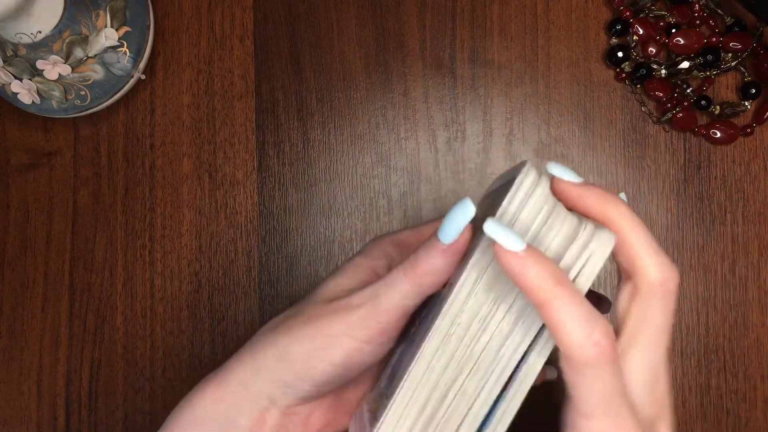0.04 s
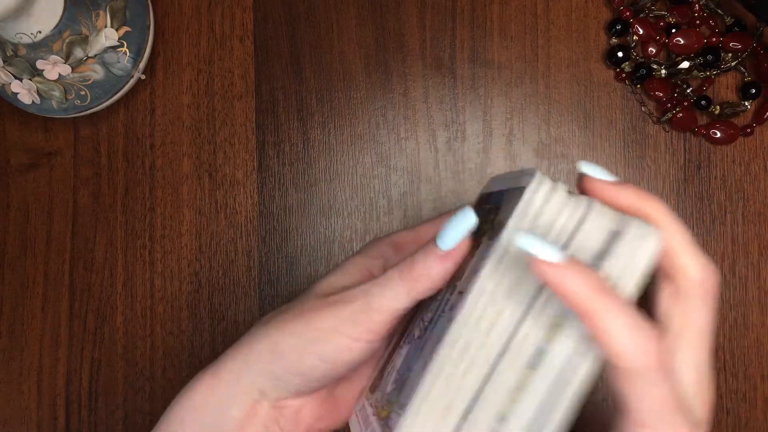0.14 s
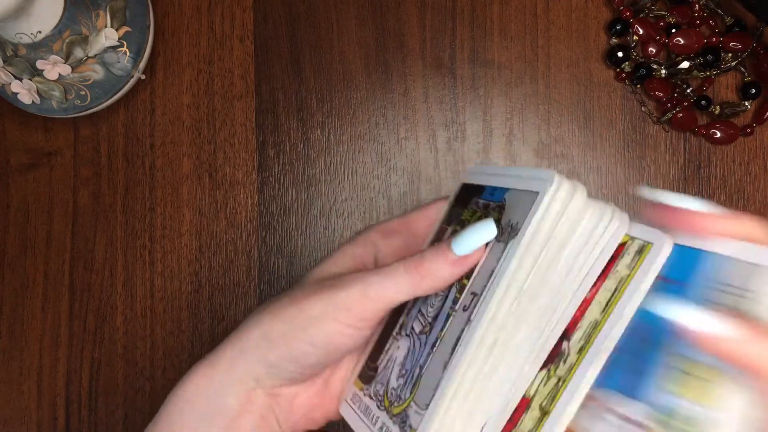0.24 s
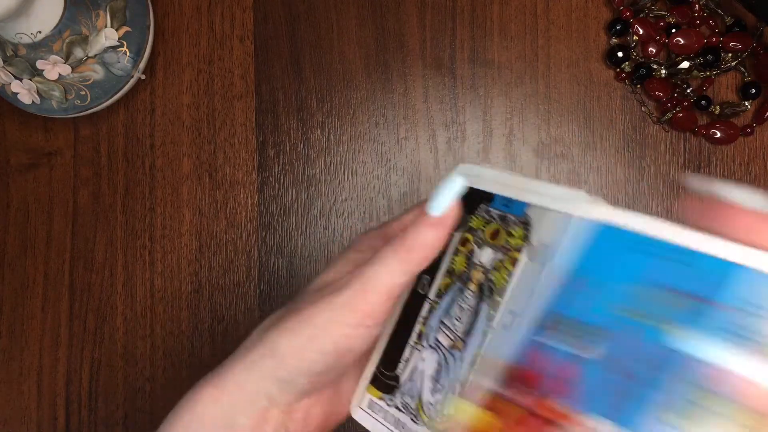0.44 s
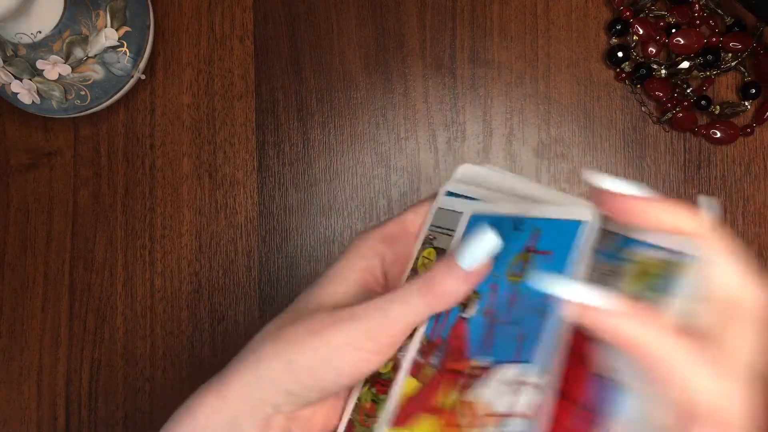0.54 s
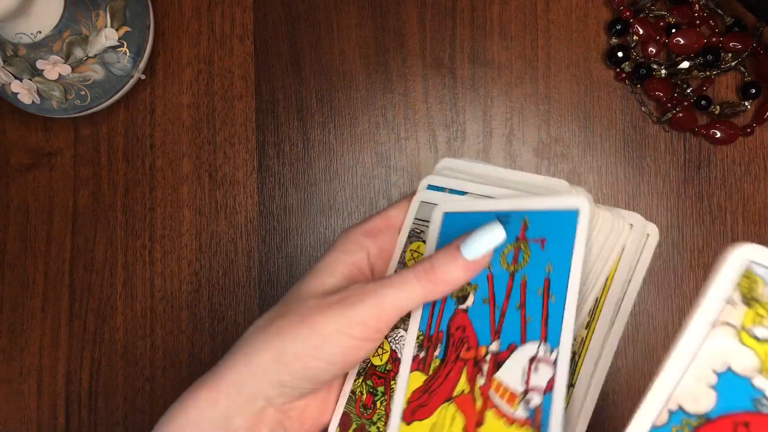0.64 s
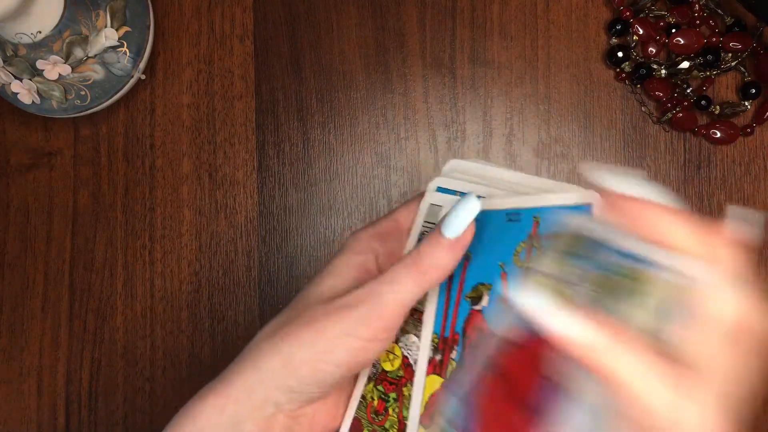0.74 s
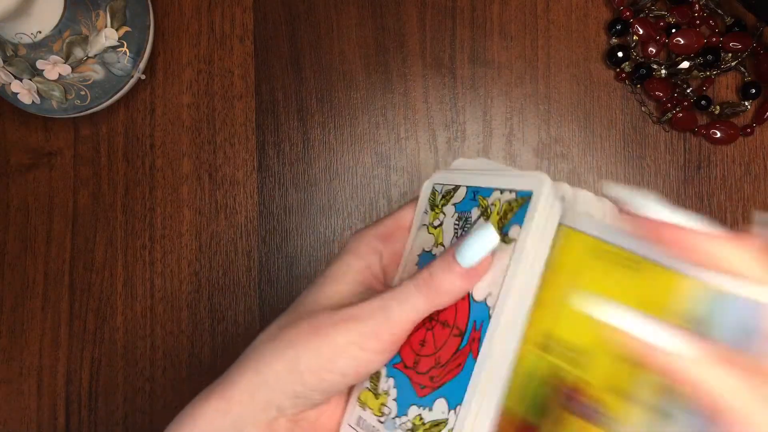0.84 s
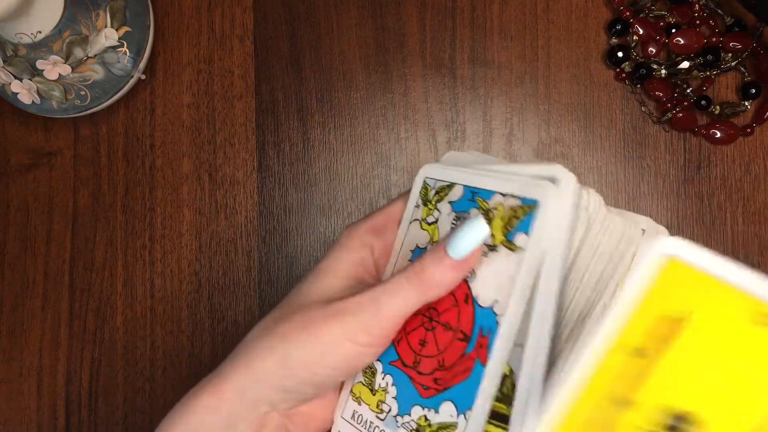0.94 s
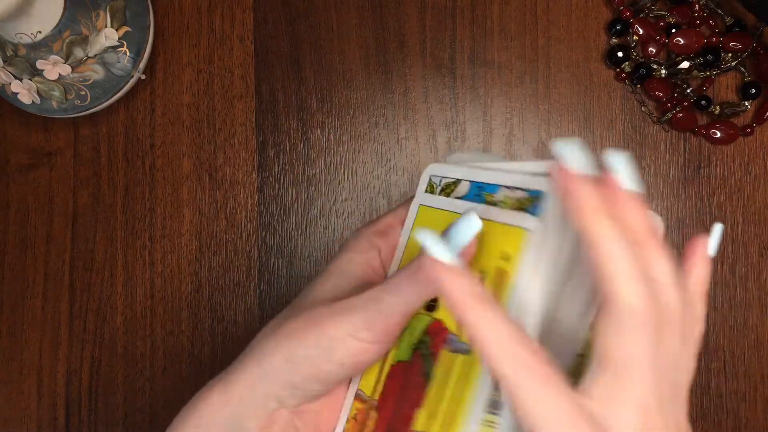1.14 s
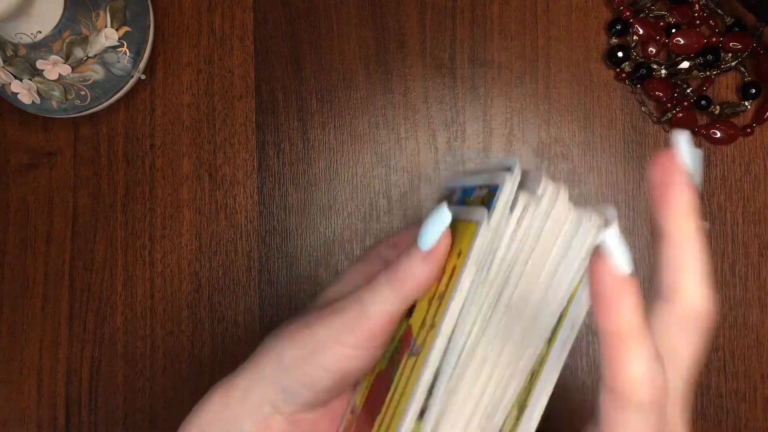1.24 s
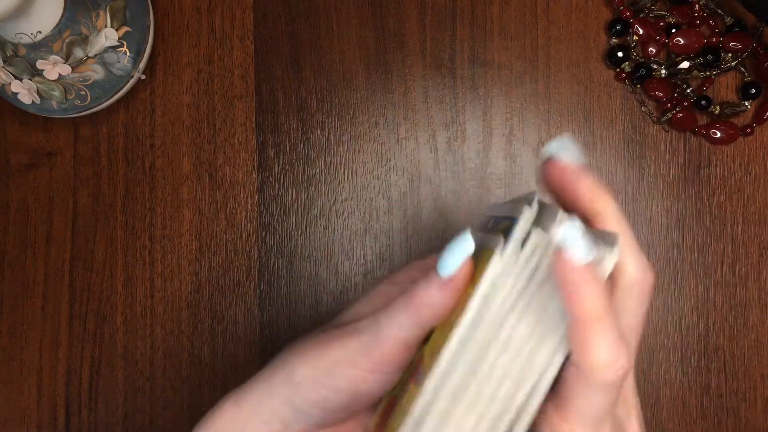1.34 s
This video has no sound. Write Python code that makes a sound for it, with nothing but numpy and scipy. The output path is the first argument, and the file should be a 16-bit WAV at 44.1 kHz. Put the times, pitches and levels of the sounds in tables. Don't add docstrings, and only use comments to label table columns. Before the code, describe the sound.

A stiff deck of cards shuffled close by, crisp edge snaps and short hisses in quiet

```python
import sys
import numpy as np
from scipy import signal
from scipy.fft import rfft, irfft
from scipy.io import wavfile

SR = 44100
rng = np.random.default_rng(int(sys.argv[2]) if len(sys.argv) > 2 else 0)


def materialize(psi):
    bounded = np.clip(np.atleast_2d(psi).T, -1, 1)
    quanta = np.round(bounded * 32767).astype(np.int16)
    wavfile.write(sys.argv[1], SR, quanta)


def ratio(d):
    e = np.asarray(d, float) / 20
    return 10 ** e


N = 61739


def rms_one(x):
    return x / np.sqrt(np.mean(x ** 2) + 1e-20)


def colour(x, points):
    hz, db = np.transpose(points)
    f = np.maximum(np.arange(len(x) // 2 + 1) * SR / len(x), 1)
    gain_db = np.interp(np.log(f), np.log(hz), db, left=-60)
    return irfft(rfft(x) * ratio(gain_db), len(x))


def drift(rate_hz):
    r = np.exp(-2 * np.pi * rate_hz / SR)
    wander = signal.lfilter([1], [1, -2 * r, r * r], rng.standard_normal(2 * N))
    return rms_one(wander[N:])


def ring(x, hz, t60):
    r = ratio(-60 / (t60 * SR))
    w = 2 * np.pi * hz / SR
    return signal.lfilter([0, np.sin(w)], [1, -2 * r * np.cos(w), r * r], x + 1e-18)


def grains(size, per_s, spread_db):
    when, how, sign = rng.random((3, size))
    height = ratio(spread_db * np.minimum(-np.log(how + 1e-9), 4))
    return (when < per_s / SR) * height * np.sign(sign - .5)


def top_cut(x):
    return signal.sosfilt(signal.cheby2(16, 60, 16250, fs=SR, output="sos"), x)


# frequency in Hz, level in dB per Hz.
ROOM_TONE_SPECTRUM = [(18, -35), (45, -2), (110, 0), (250, -6), (800, -16), (2300, -16), (3600, -24),
                      (16000, -22)]
ROOM_TONE_DB = -67.5


def room_tone():
    return ratio(ROOM_TONE_DB) * rms_one(colour(rng.standard_normal(N), ROOM_TONE_SPECTRUM))


# moment of most pressure in seconds, rms level in dB,
# rise in seconds per 20 dB, fall in seconds per 20 dB, brightness in dB.
SLIDES = [(.03, -69, .3, .3, 6), (.13, -62, .06, .1, 6), (.185, -59, .05, .08, 9),
          (.232, -47, .045, .03, 22), (.252, -39, .02, .025, 8), (.275, -54, .01, .1, -11),
          (.44, -53, .01, .03, 0), (.465, -43, .03, .03, 0), (.483, -41, .01, .022, 3),
          (.525, -48, .01, .05, -2), (.55, -40, .008, .025, -1), (.568, -47, .015, .025, -9),
          (.61, -61, .05, .12, 3), (.722, -49, .01, .02, 8), (.734, -36, .005, .05, -3),
          (.76, -39, .02, .05, -1), (.81, -55, .05, .1, -6), (.994, -42, .012, .03, -3),
          (1.007, -40, .015, .03, 3), (1.026, -43, .01, .05, 0), (1.065, -51, .03, .045, -6),
          (1.25, -57, .025, .15, 4), (1.36, -50, .065, .06, 3), (1.395, -54, .03, .05, 6)]
# frequency in Hz, level in dB per Hz.
SLIDE_SPECTRUM = [(150, -39), (250, -9), (816, -7), (1730, -1), (2570, -4), (2810, -2), (5070, -8),
                  (14700, -4), (16000, -8)]
GRIT_PER_S, GRIT_SPREAD_DB = 16000, 2.6
GRIT_PATCH_DB, GRIT_PATCH_HZ = 2.0, 120
BRIGHT_HZ = 2600


def slides():
    t = np.arange(N) / SR
    grit = rms_one(colour(grains(N, GRIT_PER_S, GRIT_SPREAD_DB), SLIDE_SPECTRUM))
    dull_grit = signal.sosfiltfilt(signal.butter(2, BRIGHT_HZ, fs=SR, output="sos"), grit)
    bright_grit = grit - dull_grit
    low_power, high_power = np.zeros(N), np.zeros(N)
    for s, level_db, rise_s, fall_s, bright_db in SLIDES:
        steps_down = np.where(t < s, (s - t) / rise_s, (t - s) / fall_s)
        stroke = ratio(level_db - 20 * steps_down)
        low_power += (stroke * ratio(-bright_db / 2)) ** 2
        high_power += (stroke * ratio(bright_db / 2)) ** 2
    low_patch, high_patch = [ratio(GRIT_PATCH_DB * drift(GRIT_PATCH_HZ)) for _ in range(2)]
    return np.sqrt(low_power) * low_patch * dull_grit + np.sqrt(high_power) * high_patch * bright_grit


# start in seconds, peak in dB, pitch in Hz, t60 in seconds.
PUFFS = [(.1, -62, 60, .15), (.17, -58, 85, .2), (.262, -54, 80, .12), (.45, -52, 130, .1),
         (.484, -47, 72, .1), (.518, -49, 85, .1), (.545, -47, 110, .1), (.575, -46, 100, .1),
         (.59, -50, 60, .1), (.724, -46, 180, .07), (.73, -57, 55, .15), (.77, -53, 70, .25),
         (.856, -45, 75, .11), (.985, -50, 70, .12), (1.01, -49, 130, .12), (1.085, -52, 95, .1),
         (1.24, -60, 60, .12)]
PUFF_SOFT_S = .004
FLUTTER_DB, FLUTTER_BAND_HZ = -9, [130, 500]


def puffs():
    out, t = np.zeros(N + SR), np.arange(SR // 2) / SR
    band = signal.butter(2, FLUTTER_BAND_HZ, "band", fs=SR, output="sos")
    flutter = ratio(FLUTTER_DB) * rms_one(signal.sosfilt(band, rng.standard_normal(N + SR)))
    for s, peak_db, hz, t60 in PUFFS:
        i = int(s * SR)
        push = 2 * ratio(peak_db - 60 * t / t60) * (1 - np.exp(-t / PUFF_SOFT_S))
        loose_cards = flutter[i:i + len(t)] * ratio(-60 * t / t60)
        out[i:i + len(t)] += push * (np.sin(2 * np.pi * hz * t) + loose_cards)
    return out[:N]


# start in seconds, peak in dB, card pitch in Hz,
# crackle length in ms per 20 dB, brightness in dB.
SNAPS = [(.172, -35, 2600, 4, -10), (.2625, -22, 2940, 7, -8), (.2685, -30, 2090, 3, -3),
         (.431, -42, 900, 3, -18), (.438, -43, 1170, 5, -8), (.4488, -22, 1700, 4, 6),
         (.4525, -18, 11500, 3.5, -2), (.463, -34, 1500, 8, 3), (.4737, -17, 2900, 3, 8),
         (.478, -25, 1100, 7, 10), (.4892, -25, 6000, 10, 6), (.511, -40, 2890, 4, -6),
         (.5185, -20, 3700, 5, 4), (.546, -32, 2700, 10, 0), (.565, -37, 2600, 10, -5),
         (.7277, -3, 2790, 1.6, 6), (.8522, -33, 2300, 3, 3), (.8638, -32, 6500, 2.5, 8),
         (.8895, -50, 3230, 2, -3), (.9838, -33, 2610, 2.5, 2), (1.0126, -12, 5520, 2.5, 0),
         (1.0205, -26, 1500, 8, 12), (1.2455, -35, 3000, 4, 2), (1.36, -42, 2790, 6, 6)]
# frequency in Hz, level in dB.
EDGE_SPECTRUM = [(1000, -17), (3000, -6), (6000, -2), (10000, 0), (15000, -2)]
EDGE_DB = 7
FIRST_CRACK = 2.5
CRACKS_PER_S, CRACK_SPREAD_DB = 12000, 3.0
CARD_RING_CYCLES = 6.0
BODY_DB, BODY_MODES_HZ, BODY_CYCLES = -14, (640, 1120), 6.0
BODY_FULL_DB, BODY_LIMIT = -21, .6
BODY_PITCH_HZ, BODY_LOSS_DB_PER_OCT = 3300, 9
LOUD_DB = -24


def snaps():
    out, size = np.zeros(N + SR), 1500
    t = np.arange(size) / SR
    hz, db = np.transpose(EDGE_SPECTRUM)
    edge_fir = signal.firwin2(129, np.r_[0, hz, SR / 2], np.r_[0, ratio(2 * db), 0], fs=SR)
    edge_fir = signal.minimum_phase(edge_fir)
    for s, peak_db, card_hz, ms, bright_db in SNAPS:
        crackle_s = max(ms, .2) * 1e-3
        cracks = grains(size, CRACKS_PER_S, CRACK_SPREAD_DB) * ratio(-20 * t / crackle_s)
        cracks[0] = FIRST_CRACK
        bend = ring(cracks, card_hz, CARD_RING_CYCLES / card_hz)
        card = np.diff(bend, prepend=0) * SR / (2 * np.pi * card_hz)
        edge = ratio(bright_db + EDGE_DB) * signal.lfilter(edge_fir, 1, cracks)
        snap = card + edge
        if peak_db <= LOUD_DB:
            snap = top_cut(snap)
        body = sum(ring(cracks, mode_hz, BODY_CYCLES / mode_hz) for mode_hz in BODY_MODES_HZ)
        body_db = BODY_DB - BODY_LIMIT * max(peak_db - BODY_FULL_DB, 0)
        body_db -= BODY_LOSS_DB_PER_OCT * np.log2(max(card_hz / BODY_PITCH_HZ, 1))
        i = int(s * SR)
        sound = snap / np.abs(snap).max() + ratio(body_db) * body / np.abs(body).max()
        out[i:i + size] += ratio(peak_db) * sound
    return out[:N]


ROOM_T60_S, ROOM_DB, WALL_CUT_HZ = .25, -30, 3500


def room(x):
    t = np.arange(SR // 2) / SR
    tail = rng.standard_normal(len(t)) * ratio(-60 * t / ROOM_T60_S) * (t > .004)
    tail = signal.sosfilt(signal.butter(1, WALL_CUT_HZ, fs=SR, output="sos"), tail)
    tail /= np.sqrt(np.sum(tail ** 2))
    return ratio(ROOM_DB) * signal.fftconvolve(x, tail)[:N]


def scene():
    tone = room_tone()
    hiss = slides()
    air = puffs()
    thin = signal.butter(2, 170, "high", fs=SR, output="sos")
    cracks = signal.sosfilt(thin, snaps())
    mix = cracks + top_cut(hiss + room(cracks + hiss) + air + tone)
    return mix[None]


def low_pass(x):
    return signal.sosfilt(signal.butter(12, 17000, fs=SR, output="sos"), x)


def record(dry):
    return low_pass(dry)


dry = scene()
out = record(dry)
materialize(out)
```